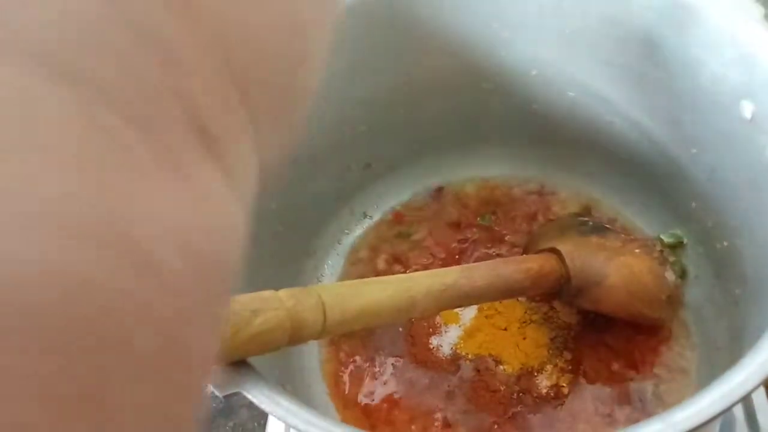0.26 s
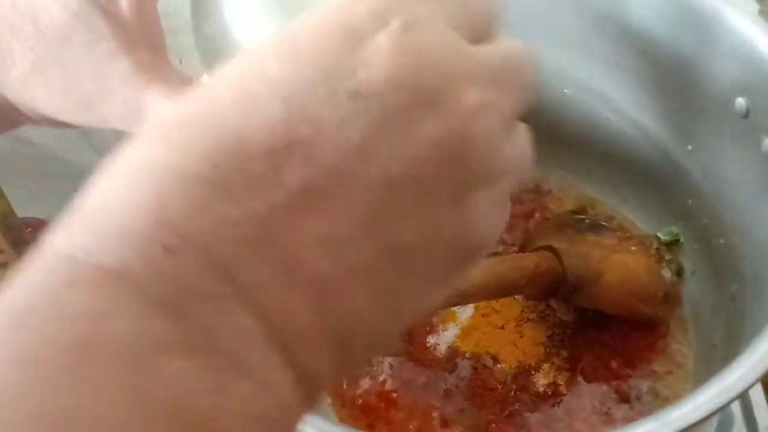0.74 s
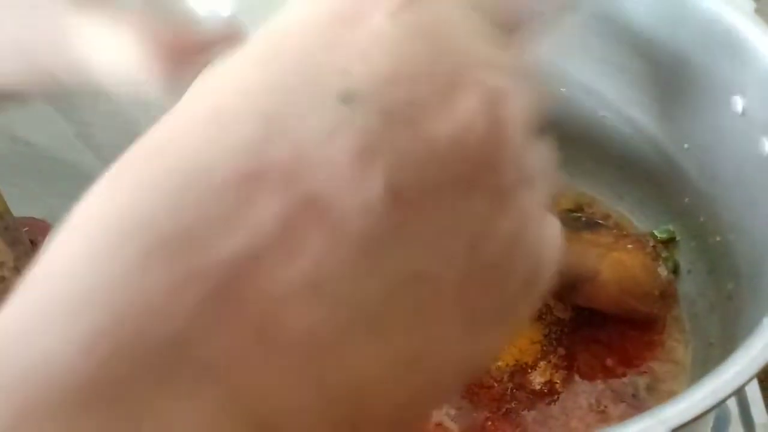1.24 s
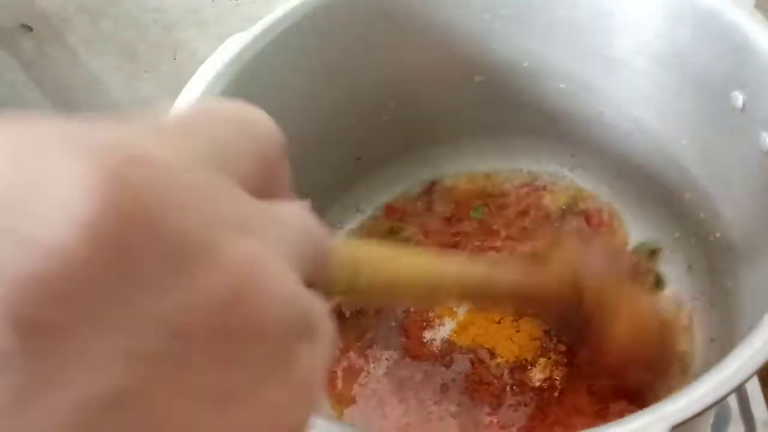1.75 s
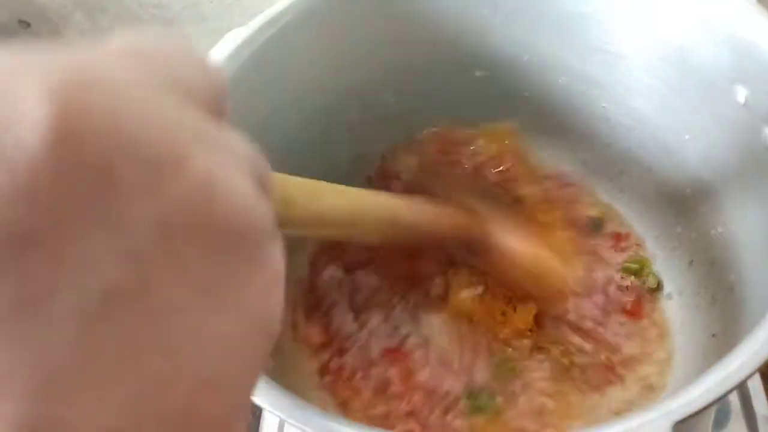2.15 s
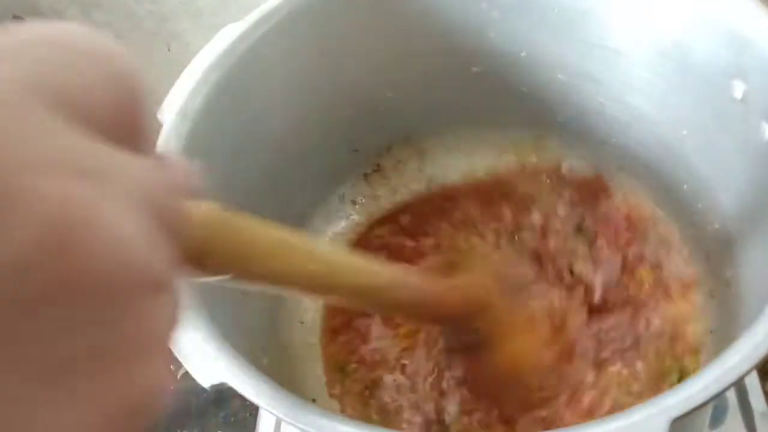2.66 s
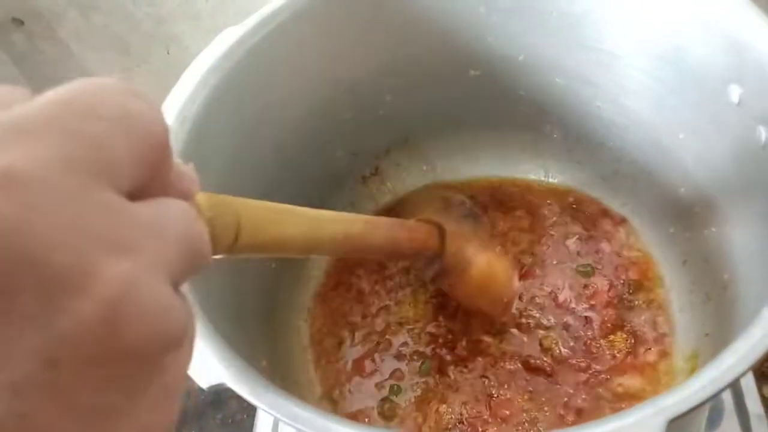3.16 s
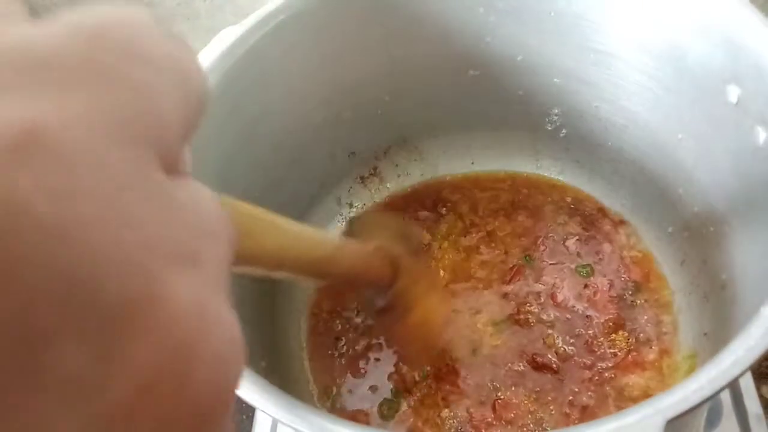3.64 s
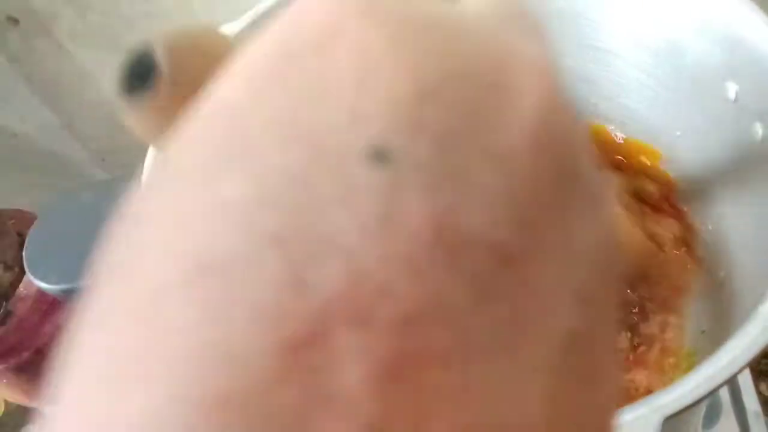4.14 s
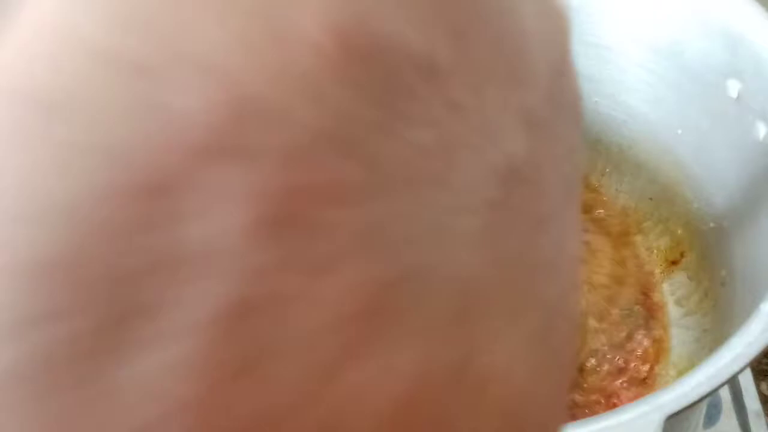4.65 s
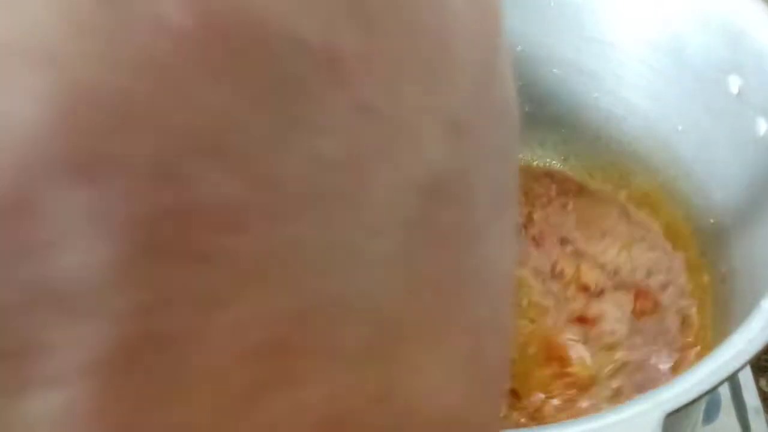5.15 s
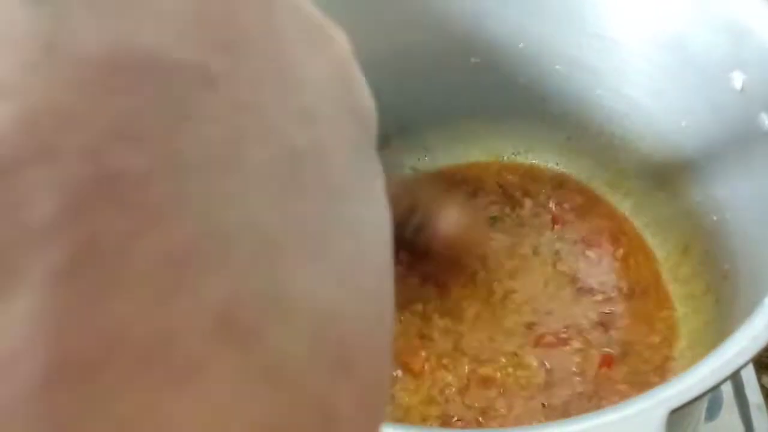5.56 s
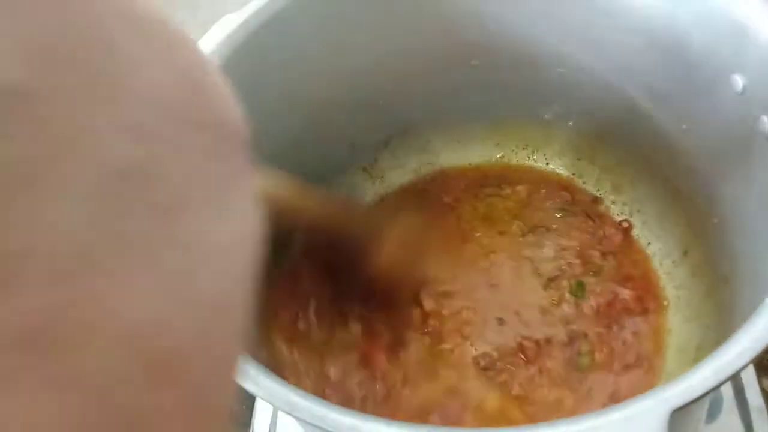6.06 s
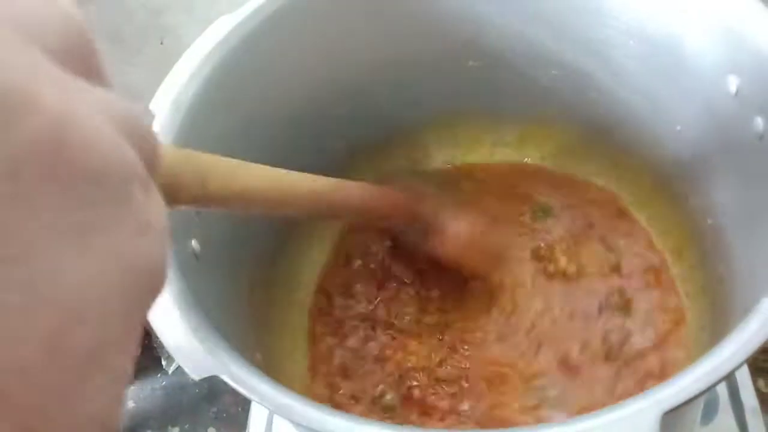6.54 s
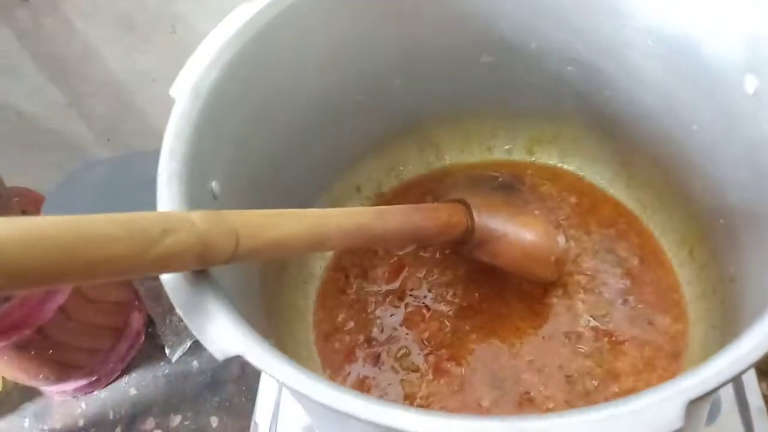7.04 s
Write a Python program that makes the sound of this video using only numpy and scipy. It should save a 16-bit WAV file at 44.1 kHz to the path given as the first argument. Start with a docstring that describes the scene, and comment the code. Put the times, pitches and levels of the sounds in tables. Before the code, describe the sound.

Thick paste fries quietly in a deep aluminium pot with small oil snaps. At about two seconds a wooden spoon stirs and the sizzle flares loudly. Steel dishes clatter nearby, then more stirring brings hollow knocks, scrapes and sharp cracks, strongest late on. The frying settles at the end. Close microphone in a small, hard kitchen with low rumble and a faint thin tone.

```python
"""Sizzling is heard first: spice paste fries in a deep aluminium pot, as noise, random clicks and ringing bubbles.
A wooden spoon stirs, drags and knocks: stick-slip and blows excite the pot's damped modes, as decaying sines.
Stirring bares hot metal and the sizzle swells; sharp snaps, from spitting oil and from cracks and scrapes of
the spoon, are clicks with short pitched noise bursts. Steel dishes clatter on the counter nearby, as struck and
chattering modes; a flame, rumble and thin tone lie beneath. One close microphone in a small hard kitchen."""
import sys
import numpy as np
from scipy import signal
from scipy.fft import rfft, irfft
from scipy.io import wavfile

SR = 44100
rng = np.random.default_rng(int(sys.argv[2]) if len(sys.argv) > 2 else 0)


def put_to_file(sound):
    """Save the sound as 16-bit audio at rate SR, in the file named by the first command-line argument."""
    columns = np.atleast_2d(sound).T  # one column per channel
    safe = np.clip(columns, -1, 1)
    whole_steps = np.round(safe * 32767)
    wavfile.write(sys.argv[1], SR, whole_steps.astype(np.int16))


N = 321930

# Spectra are relative densities; the filter that uses them fixes the total power.
# kitchen rumble: f/Hz, density/dB
RUMBLE_SPECTRUM = [(110, -68), (180, -9.5), (354, -7), (634, -16), (949, -10.5), (1020, -9), (1250, -26),
                   (1860, -17), (2000, -40), (2600, -27), (4400, -120)]
# sizzle of the resting paste: f/Hz, density/dB
RESTING_SPECTRUM = [(880, -19.5), (1500, -20), (1900, -14), (2060, -2), (2180, -12.5), (3190, -16),
                    (3830, -22), (4390, -9.5), (4850, -7), (5930, 2.5), (6610, 2.5), (7580, 3.5),
                    (9510, -11), (12300, -17.5), (13200, -18)]
# sizzle on bared metal: f/Hz, density/dB
BARED_SPECTRUM = [(350, -11.5), (600, -3), (856, -5), (939, 8), (1110, -6), (1270, 2.5), (1700, -0.5),
                  (2070, -8.5), (2430, -4.5), (4450, 6.5), (7240, 1.5), (11600, -37.5), (14000, -36)]
# finest spray: f/Hz, density/dB
SPRAY_SPECTRUM = [(7350, -72), (12500, -44), (13600, -28), (14900, 14), (15600, 11), (16000, 2.5)]
# broad rattle of a knock: f/Hz, density/dB
RATTLE_SPECTRUM = [(250, -22), (420, 0), (526, 2), (1150, -9), (1270, -4), (2460, -20), (3260, -14),
                   (3690, -23.5), (7140, -15.5), (12000, -98), (15600, -95), (22000, -120)]
# crack from the edge of the spoon: f/Hz, density/dB
CRACK_SPECTRUM = [(300, -22), (1500, -14), (2600, -21.5), (4500, -1), (6500, -2), (8500, -11),
                  (11000, -26.5), (15000, -21)]
# crash of dishes: f/Hz, density/dB
CRASH_SPECTRUM = [(180, -30), (300, -18.5), (1090, 1), (1250, 4.5), (2480, -12), (3220, 8.5), (3980, -10.5),
                  (5800, -3), (8600, -17.5), (9960, -37), (15000, -46)]
# dish modes too dense to count: f/Hz, density/dB
JANGLE_SPECTRUM = [(600, -26.5), (900, -14), (2000, -31.5), (4500, -1), (6300, 1), (7500, -4),
                   (9500, -10.5), (13000, -36.5)]
# steel bowl, its modes in close groups that beat: f/Hz, level/dB, t60/s
BOWL_MODES = [(1238, -11, .45), (1223, -14, .35), (1250, -14, .35), (1271, -16, .35), (1443, -16, .5),
              (2191, -20, .25), (2680, -19, .3), (2767, -15, .28), (3247, -1.5, .52), (3232, -8, .42),
              (3305, -13, .35), (5685, -5, .48), (5675, -7, .45), (5706, -13, .3), (8665, -12, .3),
              (8620, -18, .22), (8700, -20, .22), (10450, -31, .22), (10900, -34, .22), (12063, -31, .25),
              (12021, -34, .22)]
# steel plate, before damping by contact: f/Hz, level/dB, t60/s
PLATE_MODES = [(920, -6, 1), (935, -11.5, 0.27), (950, -8.5, 0.26), (2345, -11, 0.55), (3745, -10.5, 0.18),
               (5570, -34, 0.15), (6000, -4, 0.053), (6380, 5, 0.035), (7310, -0.5, 0.31),
               (7060, -44, 0.055), (8800, -4.5, 0.2), (9448, -36, .1)]
# steel lid, before damping by contact: f/Hz, level/dB, t60/s
LID_MODES = [(703, -11, 0.17), (833, -5, 0.17), (1300, -17, 0.21), (3127, -11, 0.11), (4526, -7, 0.12),
             (5940, -6, 0.18), (5721, -7.5, 0.11), (5820, -1, .12), (7180, -9, 0.11), (8440, -7.5, 0.14),
             (9200, -10, 0.082)]
# dish contacts: t/s, bowl level/dB, bowl brightness/(dB per octave), plate level/dB, lid level/dB, crash level/dB
DISH_CONTACTS = [(2.791, -15, 1, -59, -55, -25), (2.801, -38, 1, -58, -55, -30),
                 (2.821, -34, 1, -54, -55, -29), (2.865, -25, -5, -47, -52, -33),
                 (2.899, -30, -2.5, -50, -52, -36), (3.169, -26.5, 2, -24.5, -45, -26),
                 (3.19, -36, 3, -36, -30, -33), (3.217, -39, 1, -34, -42, -40),
                 (3.326, -42, 4, -38, -33.5, -36), (3.337, -35, 0.5, -48, -33, -29),
                 (3.356, -42, -3, -45, -33, -34)]
# a small metal clink: t/s, then its modes as f/Hz, level/dB, t60/s
METAL_CLINK = (0.99, [(3100, -42, 0.066), (3180, -47, 0.091), (1434, -40, 0.06), (5350, -34, 0.023)])
# sharp snaps, oil spits and cracks and scrapes of the spoon:
# t/s, burst peak level/dB, f/Hz, broad snap level/dB re burst peak
SHARP_SNAPS = [(0.0278, -34.5, 4700, -11), (0.167, -34, 5840, -13), (0.2264, -33, 7130, -6),
               (0.2563, -35, 6310, -6), (0.3207, -35, 5600, -16), (0.3626, -35, 5900, 9),
               (0.6355, -37, 4430, -15), (0.6584, -30.5, 7400, -11), (0.7497, -33.5, 5770, -15),
               (0.8106, -33.5, 6050, 4), (0.8184, -38, 5500, -2), (0.9757, -30.5, 5550, 5),
               (1.0635, -38, 7950, -12), (1.3843, -30, 7260, -16), (1.513, -34, 6350, -3),
               (1.6551, -31, 7500, -8), (1.7554, -36, 5870, 5), (1.8467, -29.5, 7440, -12),
               (1.8554, -32, 6100, 3), (1.947, -25, 6230, -17), (1.9654, -29, 6900, -6),
               (1.9804, -27.5, 6000, -9), (1.9874, -28, 7060, -1), (2.0073, -28, 5400, 4),
               (2.1515, -36, 7600, -9), (3.8297, -31.5, 7500, -1), (3.8831, -31, 6290, 2),
               (3.9095, -30.5, 5900, -6), (4.2802, -22.5, 5350, -9), (4.2996, -23, 7600, 1),
               (4.3176, -23.5, 4700, 3), (4.3634, -31, 3500, -13), (4.5431, -34, 6170, -10),
               (4.7262, -26.5, 5660, 2.5), (5.0664, -28, 6240, -6), (5.0794, -20.5, 6400, -6),
               (5.0904, -22, 6010, -6), (5.1018, -19, 6700, -3.5), (5.1267, -20.5, 6440, 0),
               (5.1394, -30, 7200, -3), (5.8341, -41, 3700, 10), (6.0192, -14.5, 6900, -21),
               (6.0826, -24.5, 5940, -7), (6.1554, -18.5, 7300, -4), (6.5944, -28.5, 7250, -3),
               (1.3039, -43, 3060, -4), (5.1677, -45, 3130, -4), (5.2295, -38, 3580, 3),
               (5.2444, -49, 3140, -4)]
# pot on its stand, ringing freely: f/Hz, level/dB, t60/s
POT_MODES = [(121, -8.5, 0.49), (180, -4.5, 0.22), (229, -1, 0.26), (291, 2, 0.8), (354, -1, 0.55),
             (403, -9, 0.22), (447, -16, 0.3), (520, 0, 0.22), (578.8, -0.5, 0.077), (751, -7.5, 0.58),
             (930, -17, 1), (1098, -42, 0.33), (1190, -18, 0.11), (1270, 7, 0.18), (1407, 4.5, 0.17),
             (1800, 3.5, .1), (2040, -2, 0.077), (2690, 4, 0.03), (3780, 4.5, 0.02)]
# spoon knocks: t/s, reference level/dB, favoured f/Hz, modes below 260 Hz level/dB,
# modes above 900 Hz level/dB, rattle level/dB and crack level/dB re the reference
SPOON_KNOCKS = [(1.839, -44.5, 910, -8, 19.5, -6, -20), (1.988, -35.5, 520, 8, 2, -9, -20),
                (2.35, -31, 556, -6, -19, -10, -20), (2.388, -33, 553, 7, 9.5, -25, -20),
                (3.691, -29.5, 185, 8.5, -25, -20, -25), (3.838, -39.5, 303, 0, 2, -4.5, -18),
                (4.209, -29.5, 490, 1, -8, -27, -22), (4.298, -37, 920, 3, 7, -7.5, -23),
                (4.431, -18.5, 563, -18, -28, -14, 10.5), (4.559, -35.5, 290, -20, 5, -10, -20),
                (4.713, -42, 288, 23, -12, -29, -16), (4.994, -17.5, 536, 8, -26, -19, -9),
                (5.03, -40, 310, 1, -18, -30, -20), (5.078, -25.5, 520, -13, -26, -18, -25),
                (5.13, -28.5, 514, -17, -5, -10.5, -22), (5.718, -14.5, 339, -1, -11, -14.5, -10),
                (5.981, -23.5, 524, -6, -25, -19, -3), (6.018, -25, 357, 7.5, -18, -20, -1),
                (6.271, -27.5, 515, 3, -25, -36, -25), (6.388, -43, 473, 16, -5, -3, -20),
                (6.691, -19.5, 490, 7, 9, -7.5, 0), (6.706, -16, 306, 3, -17, -21, -6),
                (6.889, -52, 290, -3, -12, 4, -7), (7.191, -34.5, 290, -3, -21, -18, -25)]
# drags over the bottom: start t/s, length t/s, level/dB, favoured f/Hz, lift above 430 Hz level/dB
SPOON_DRAGS = [(0.133, 0.034, -72, 294, -3), (.62, 0.31, -77.5, 297, -26), (1.633, 0.14, -74, 293, 7),
               (1.91, 0.23, -64.5, 312, -1), (2.29, 0.45, -62.5, 584, -1), (2.788, 0.091, -55.5, 413, 5),
               (3.65, 0.39, -60.5, 310, 0.5), (4.18, 0.19, -63.5, 294, 8), (4.381, 0.18, -52, 288, -6),
               (4.69, .1, -57, 286, -2), (4.979, 0.16, -55.5, 523, 3), (5.3, 0.24, -74, 300, -15),
               (5.706, 0.12, -44, 310, -7), (6.002, 0.067, -46, 322, -12), (6.257, 0.028, -55.5, 350, 1),
               (6.377, 0.18, -73.5, 550, 5), (6.68, 0.084, -43.5, 285, -0.5), (6.87, 0.18, -62, 274, -2),
               (7.04, .22, -66.5, 300, 4)]
# wall resonances that hum with the frying: f/Hz, width/Hz (t60 = 3.76 / width), level/dB
WALL_MODES = [(929, 18, 0), (1200, 37, -5), (1275, 111, 0.5), (1438, 70, -10.5), (1950, 29, -14),
              (2303, 5.7, -5), (5800, 84, -1.5)]
# vigour of the frying: t/s, resting sizzle level/dB, bared-metal sizzle level/dB, finest spray level/dB
SIZZLE_LEVELS = [(0, -51, -58.5, -57), (.7, -53, -60, -58), (1.34, -51.5, -64.5, -55.5),
                 (1.77, -49.5, -55.5, -54), (1.99, -52, -50.5, -58), (2.09, -36.5, -42, -44),
                 (2.24, -42, -44, -44), (2.36, -38, -41.5, -45), (2.6, -43, -45.5, -49),
                 (2.75, -41.5, -48.5, -50), (3.05, -48.5, -54, -57), (3.5, -49.5, -49.5, -65),
                 (3.72, -55.5, -74, -63), (3.88, -49.5, -55.5, -60), (4.29, -40, -47.5, -49),
                 (4.39, -47, -49, -51), (4.55, -42, -51.5, -53), (4.67, -49, -54, -52),
                 (4.82, -48, -53.5, -60), (5.06, -50, -72, -58), (5.24, -51.5, -61, -61),
                 (5.53, -58.5, -67, -68), (5.9, -51.5, -59, -65), (6.18, -46.5, -48, -52),
                 (6.3, -53, -62, -53), (6.46, -46, -52.5, -56), (6.65, -52, -62, -59), (7.3, -56, -72, -72)]

HISS_DB, RUMBLE_DB = -85, -60
WHINE_HZ, WHINE_DB = 936, -58.5
FLAME_DB, FLUTTER_DB, FLUTTER_CORNER_HZ = -59, 4, 5
TICK_HZ, TICK_DB = 1570, -76
ROOM_T60_S, ROOM_DULL_HZ = 0.24, 5150
BASS_CUT_HZ, TOP_CUT_HZ = 139, 15620
CHATTER_DB, THUD_DB = -22, -38.5   # loose contact re a blow; counter thud re the crash
JANGLE_DB, JANGLE_T60_S = 0.5, 0.085   # re the blow on plate or lid
PUFF_T60_S, SNAP_T60_S, SNAP_TAIL_DB = 0.029, 0.035, -12
DAMPING, RUBBED_RING = 0.49, 0.7   # shares of the free t60 left in a knock and in a drag
MODE_DB = -20.5   # pot modes re the reference level of a knock
FAVOUR_DB, FAVOUR_OCTAVES = 10, 0.14   # the spot touched favours modes near one pitch
DRAG_ATTACK_S, DRAG_FADE_DB_PER_S, IDLE_DB = 0.036, 174.5, -82.5
STIRRED_DB = -39.5   # resting sizzle level under a full stir
HUM_DB, HUM_FOLLOWS = -49.5, 0.21   # wall hum under a full stir; dB per dB of resting sizzle


def amp(db):
    """Level definition: gain is ten to the power dB/20."""
    return 10 ** (np.asarray(db) / 20)


def unit(x):
    """Normalisation of power: scale to rms 1."""
    return x / np.sqrt(np.mean(x ** 2) + 1e-20)


def curves(rows):
    """Linear interpolation of table columns, sample by sample."""
    s, *columns = np.transpose(rows)
    return [np.interp(np.arange(N) / SR, s, c) for c in columns]


def colour(x, spectrum, size=4096):
    """Minimum-phase filtering to the given spectrum; white noise keeps its rms."""
    hz, db = np.transpose(spectrum)
    grid = np.maximum(np.arange(size // 2 + 1) * SR / size, 1)
    level_db = np.interp(np.log(grid), np.log(hz), db)
    # folding the cepstrum onto positive time makes the filter causal
    cepstrum = irfft(np.log(amp(level_db)))
    cepstrum[1:size // 2] *= 2
    cepstrum[size // 2 + 1:] = 0
    response = irfft(np.exp(rfft(cepstrum)))
    return signal.oaconvolve(x, response / np.sqrt(np.sum(response ** 2)))[:N]


def drift(rate):
    """Low-pass random fluctuation: white noise through two equal poles at a rate in Hz, spread 1."""
    r = np.exp(-2 * np.pi * rate / SR)
    once = signal.lfilter([1 - r], [1, -r], rng.standard_normal(N + SR))
    twice = signal.lfilter([1 - r], [1, -r], once)
    return unit(twice[SR:])   # the first second lets the filters settle


def grains(per_s, spread_db):
    """Shot noise: random clicks of uneven size and either sign, rms 1."""
    sizes = amp(spread_db * np.minimum(rng.exponential(1, N), 5))
    signed = sizes * rng.choice([-1, 1], N)
    return unit(signed * (rng.random(N) < per_s / SR))


def ring(force, hz, t60):
    """Damped resonance: a unit click excites a decaying sine of initial height 1."""
    r, w = amp(-60 / (t60 * SR)), 2 * np.pi * min(hz, 20000) / SR
    return signal.lfilter([0, np.sin(w)], [1, -2 * r * np.cos(w), r * r], force + 1e-18)


def clicks(times, gains):
    """Impulsive excitation at the given times in s."""
    out = np.zeros(N)
    np.add.at(out, (np.asarray(times) * SR).astype(int), gains)
    return out


def dying(times, gains, t60):
    """Exponential decay of white noise from each given time."""
    envelope = signal.lfilter([1], [1, -amp(-60 / (t60 * SR))], clicks(times, gains) + 1e-18)
    return envelope * rng.standard_normal(N)


def snaps(s, db, spectrum):
    """Broadband impulse: coloured clicks with a short noise tail."""
    tail = dying(s, amp(db + SNAP_TAIL_DB), SNAP_T60_S)
    return colour(clicks(s, amp(db)) + tail, spectrum)


def struck(hz, db, t60, seconds):
    """Modal superposition: a sum of decaying sines, signs alternating."""
    t = np.arange(int(seconds * SR)) / SR
    signs = (-1.) ** np.arange(len(hz))
    decays = amp(db[:, None] - 60 * t / t60[:, None])
    return signs @ (decays * np.sin(2 * np.pi * hz[:, None] * t))


def add(out, at, sound):
    """Linear superposition: mix a short sound in at a time in s."""
    i = int(at * SR)
    out[i:i + len(sound)] += sound[:N - i]


def room(x):
    """Diffuse reverberation: convolution with decaying low-passed noise."""
    t = np.arange(int(.6 * SR)) / SR
    dull = signal.lfilter(*signal.butter(1, ROOM_DULL_HZ, fs=SR), rng.standard_normal(len(t)))
    tail = dull * amp(-60 * t / ROOM_T60_S) * np.minimum(t / 0.0012, 1)   # rises over 1.2 ms
    return signal.oaconvolve(x, tail / np.sqrt(np.sum(tail ** 2)))[:N]


def kitchen_rumble():
    """Broadband low noise: a coloured random signal of slowly drifting level."""
    return amp(RUMBLE_DB + 2.1 * drift(3.2)) * colour(rng.standard_normal(N), RUMBLE_SPECTRUM)


def flame():
    """Resonance driven by noise: one low damped mode with a fluttering level."""
    level = amp(FLAME_DB + FLUTTER_DB * drift(FLUTTER_CORNER_HZ))
    return level * unit(ring(rng.standard_normal(N), 111, 0.081))


def whine():
    """Frequency modulation: a thin sine whose pitch and level waver slightly."""
    level = amp(WHINE_DB + 2.0 * drift(2.7))
    hz = WHINE_HZ + 2.82 * drift(4.07)
    return level * np.sin(2 * np.pi * np.cumsum(hz) / SR)


def ticks():
    """Periodic excitation: even noise puffs near the end pass two short resonances, a faint ticking."""
    times = np.arange(6.79, 7.2, .0945)
    puffs = dying(times, amp(TICK_DB), 0.03)
    return ring(ring(puffs, TICK_HZ, 0.0067), TICK_HZ, 0.0059)


def dishes():
    """Impact and chatter: contacts strike the bowl, rattle plate and lid, thud on the counter and crash."""
    s, bowl_db, bright_db, plate_db, lid_db, crash_db = np.transpose(DISH_CONTACTS)
    crash = dying(s, amp(crash_db), 0.3)
    thud = amp(THUD_DB) * ring(crash, 120, 0.11)
    out = colour(crash, CRASH_SPECTRUM) + thud
    pivot_hz = BOWL_MODES[8][0]   # brightness tilts the blow about this mode
    for k, (hz, mode_db, t60) in enumerate(BOWL_MODES):
        blows = clicks(s, amp(bowl_db + bright_db * np.log2(hz / pivot_hz)))
        out = out + amp(mode_db) * ring(blows, hz, t60) * (-1) ** k
    for modes, blow_db in [(PLATE_MODES, plate_db), (LID_MODES, lid_db)]:
        chatter = dying(s, amp(blow_db + CHATTER_DB), 0.14)
        # loose contact leaves 0.47 of the free t60
        out = out + sum(amp(mode_db) * ring(chatter, hz, 0.47 * t60) for hz, mode_db, t60 in modes)
        jangle = dying(s, amp(blow_db + JANGLE_DB), JANGLE_T60_S)
        out = out + colour(jangle, JANGLE_SPECTRUM)
    return out


def clink():
    """Modal decay of a small struck metal object."""
    out = np.zeros(N)
    at, modes = METAL_CLINK
    add(out, at, struck(*np.transpose(modes), .2))
    return out


def sharp_snaps():
    """Impulse and resonance: oil or spoon gives a broad snap and a brief noise burst around its own pitch."""
    s, db, _, snap_db = np.transpose(SHARP_SNAPS)
    out = snaps(s, db + snap_db, RESTING_SPECTRUM)
    t = np.arange(2600) / SR
    puffs = rng.standard_normal((len(s), 2600))
    for (at, level_db, hz, _), puff in zip(SHARP_SNAPS, puffs):
        force = puff * amp(-60 * t / PUFF_T60_S) + (t == 0) * 8   # a click opens the puff
        burst = ring(ring(force, hz, 6.8 / hz), hz, 6.8 / hz)
        add(out, at, amp(level_db) * burst / np.abs(burst).max())
    return out


def favour(hz, pitch_hz):
    """Mode selection by contact point: lift in dB of the modes near a pitch."""
    return FAVOUR_DB * np.exp(-(np.log2(hz / pitch_hz) / FAVOUR_OCTAVES) ** 2)


def drag_gains(hz):
    """Envelope of friction: each drag rises, holds and fades, with its own gain on each mode."""
    t = np.arange(0, N + 32, 32) / SR   # every 32 samples
    gains = amp(IDLE_DB) * np.ones((len(hz), len(t)))
    for start, length, db, pitch_hz, lift_db in SPOON_DRAGS:
        rise = np.clip((t - start) / DRAG_ATTACK_S, 0, 1)
        fade = amp(-DRAG_FADE_DB_PER_S * np.maximum(t - start - length, 0))
        mode_gain = amp(db + favour(hz, pitch_hz) + lift_db * (hz > 430))
        gains += np.outer(mode_gain, rise * fade)
    return [np.interp(np.arange(N) / SR, t, g) for g in gains]


def spoon_drags():
    """Stick-slip friction: irregular slips ring the rubbed modes of the pot."""
    slip_rate = 400 * amp(1.5 * drift(8))   # slips per s
    slips = signal.lfilter(*signal.butter(2, 700, fs=SR), grains(slip_rate, 2.0))
    modes = np.array(POT_MODES)
    rubbed = modes[(modes[:, 0] > 260) & (modes[:, 0] < 900)]
    return sum(gain * amp(db) * unit(ring(slips, hz, RUBBED_RING * t60))
               for gain, (hz, db, t60) in zip(drag_gains(rubbed[:, 0]), rubbed))


def spoon_knocks():
    """Impact on a damped shell: knocks ring the same modes, shortened by spoon and paste, with rattle and crack."""
    out = np.zeros(N)
    hz, mode_db, t60 = np.transpose(POT_MODES)
    # the spot struck changes each mode's share, in dB
    shares = rng.normal(0, 1.3, (len(SPOON_KNOCKS), len(POT_MODES)))
    for (at, db, pitch_hz, thump_db, upper_db, *_), share in zip(SPOON_KNOCKS, shares):
        lift = favour(hz, pitch_hz) + upper_db * (hz > 900) + thump_db * (hz < 260)
        add(out, at, struck(hz, db + MODE_DB + mode_db + lift + share, t60 * DAMPING, .4))
    s, db, *_, rattle_db, crack_db = np.transpose(SPOON_KNOCKS)
    rattle = colour(dying(s, amp(db + rattle_db), 0.17), RATTLE_SPECTRUM)
    return out + rattle + snaps(s, db + crack_db, CRACK_SPECTRUM)


def wall_hum(sizzle_db):
    """Forced resonance: noise excites the wall modes, at a level that follows the sizzle."""
    shake = rng.standard_normal(N) * amp(2.1 * drift(9.9))
    hum = sum(amp(db) * np.sqrt(width) * unit(ring(shake, hz, 3.76 / width)) for hz, width, db in WALL_MODES)
    return amp(HUM_DB + HUM_FOLLOWS * (sizzle_db - STIRRED_DB)) * unit(hum)


def bubbles(per_s, cycles):
    """Bubble resonance: random bursts ring at one of 14 pitches, falling 60 dB in the given cycles."""
    bursts, dealt = grains(per_s, 2.5), rng.integers(0, 14, N)
    pitches = np.geomspace(1500, 8500, 14)
    return unit(sum(ring(bursts * (dealt == k), hz, cycles / hz) for k, hz in enumerate(pitches)))


def fizz(crackle, per_s, flicker_db):
    """Noise with shot noise: hiss plus a share of crackle, the level flickering."""
    mixed = unit(rng.standard_normal(N) + crackle * grains(per_s, 3.9))
    return mixed * amp(flicker_db * drift(12.7))


def frying():
    """Random bursting of water droplets in oil: dense crackle on hiss, with the wall humming along."""
    sizzle_db, bared_db, spray_db = curves(SIZZLE_LEVELS)
    resting_fizz = fizz(.6, 1620, 1.8)
    bared_fizz = fizz(.6, 1110, 1.44)
    spray_fizz = fizz(.9, 600, 2.9)
    wet = amp(-11) * bubbles(per_s=460.0, cycles=170.0) + amp(-14) * grains(60., 3.0)
    resting = amp(sizzle_db) * colour(resting_fizz + wet, RESTING_SPECTRUM)
    bared = amp(bared_db) * colour(bared_fizz + wet, BARED_SPECTRUM)
    # an echo off the pot's wall cancels a narrow band, made by a notch
    notched = signal.lfilter(*signal.iirnotch(6650, 18., fs=SR), resting + bared)
    spray = amp(spray_db) * colour(spray_fizz, SPRAY_SPECTRUM)
    return notched + spray + wall_hum(sizzle_db)


def scene():
    """Superposition at one microphone; the two channels differ only by a trace of hiss."""
    near = spoon_drags() + spoon_knocks() + sharp_snaps() + ticks()
    far = dishes() + clink()
    background = kitchen_rumble() + flame() + whine()
    mono = frying() + background + near + far
    echoes = room(amp(-9.0) * near + amp(-14.5) * far)
    return mono + echoes + amp(HISS_DB) * rng.standard_normal((2, N))


def record(dry):
    """Band limiting: the microphone drops the deep bass and the top is cut steeply."""
    thin = signal.sosfilt(signal.butter(2, BASS_CUT_HZ, "high", fs=SR, output="sos"), dry)
    return signal.sosfilt(signal.ellip(10, .5, 70, TOP_CUT_HZ, fs=SR, output="sos"), thin)


dry = scene()
out = record(dry)
put_to_file(out)
```